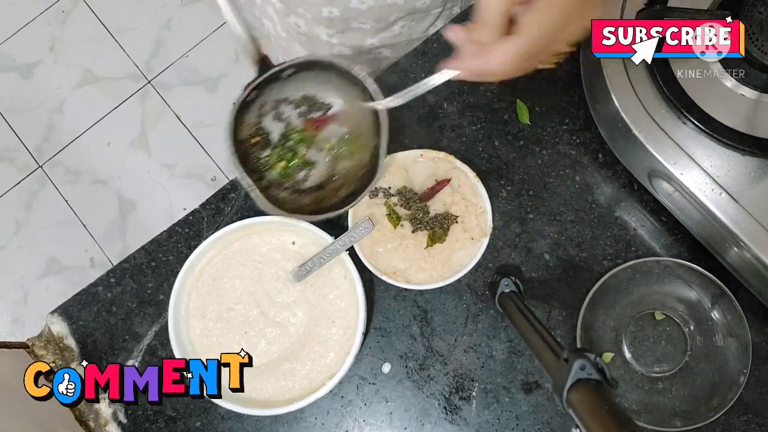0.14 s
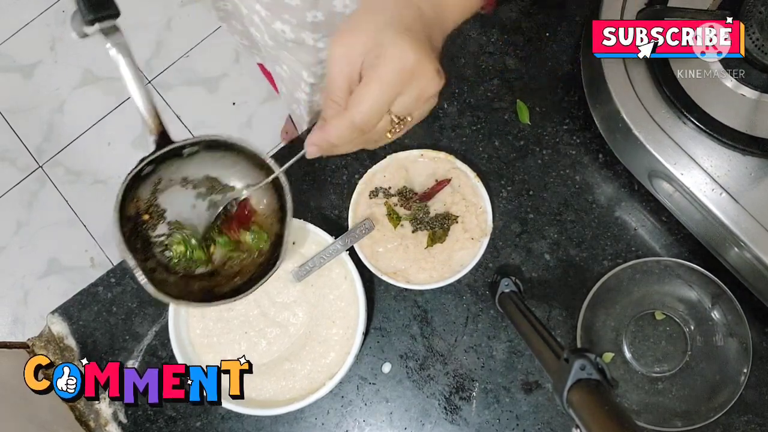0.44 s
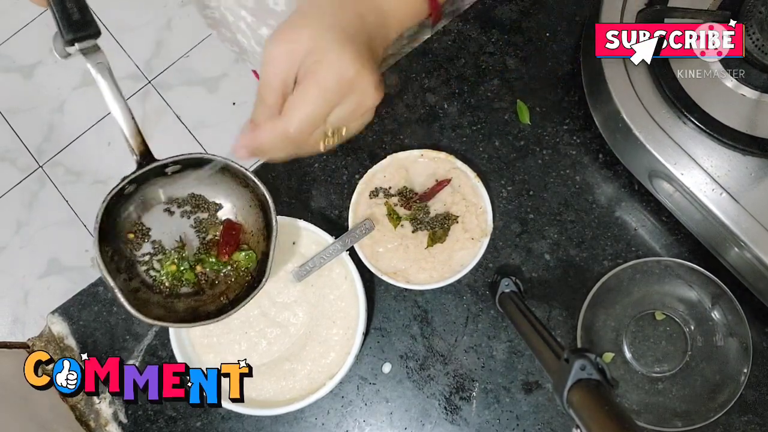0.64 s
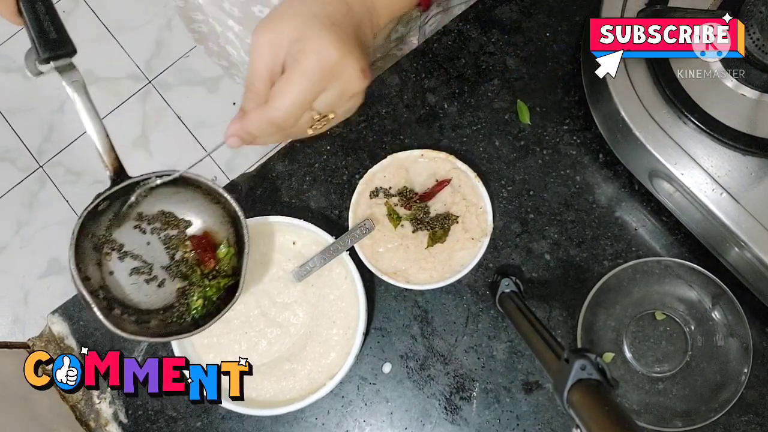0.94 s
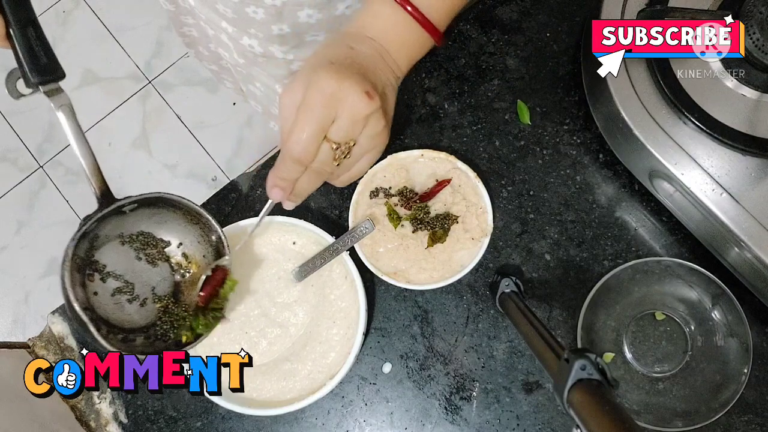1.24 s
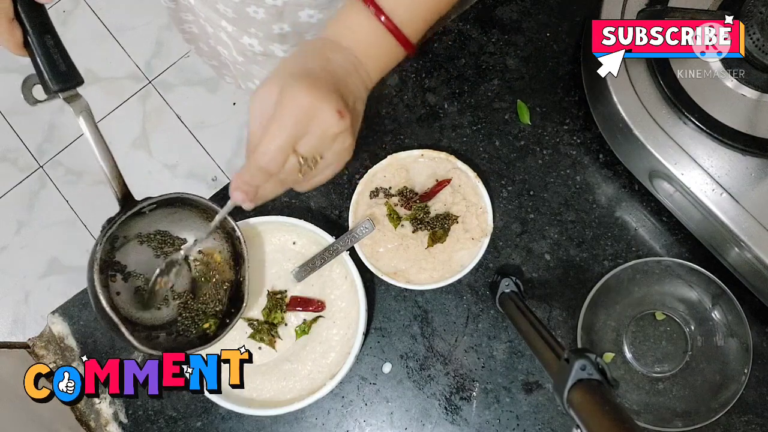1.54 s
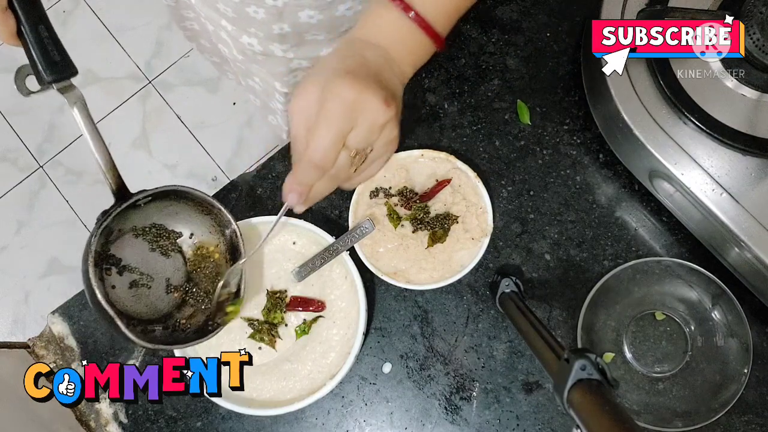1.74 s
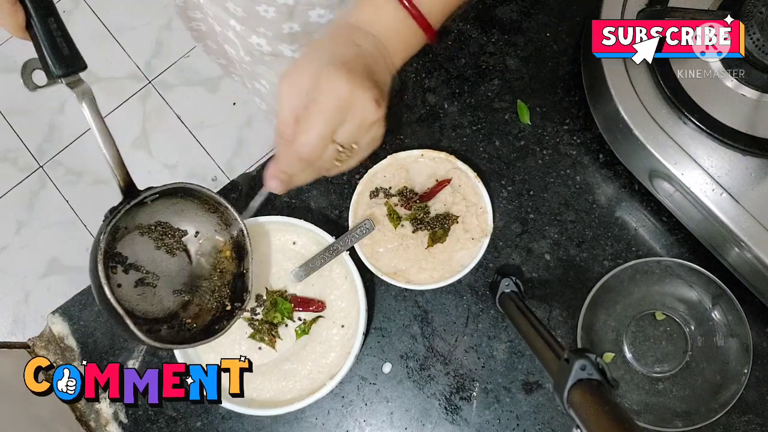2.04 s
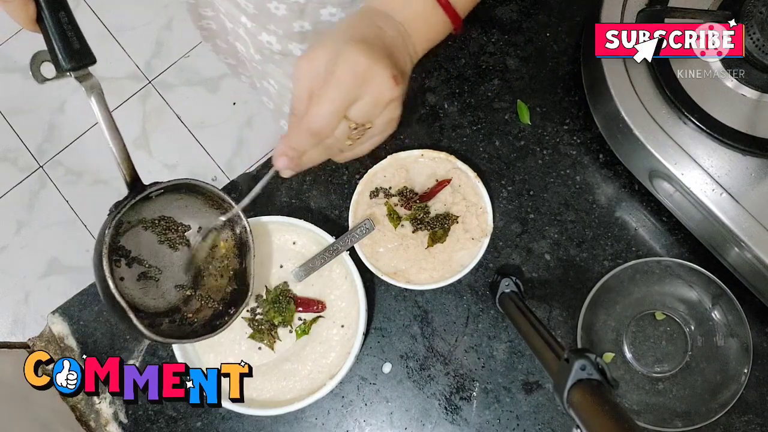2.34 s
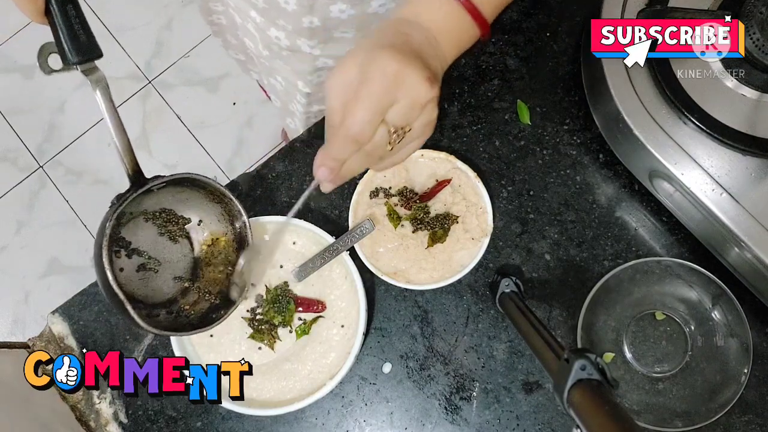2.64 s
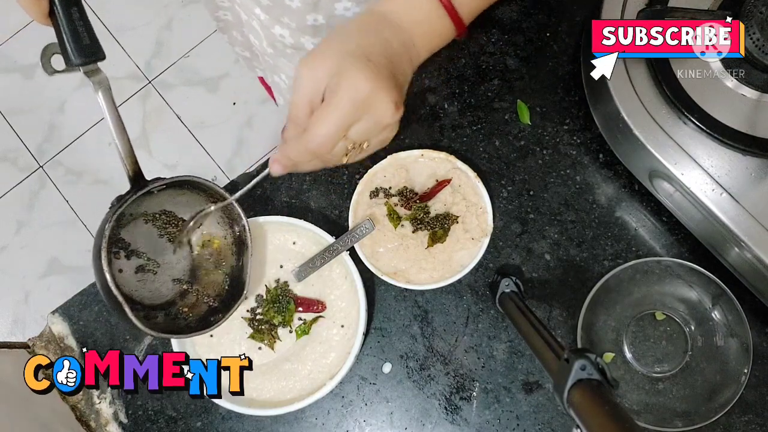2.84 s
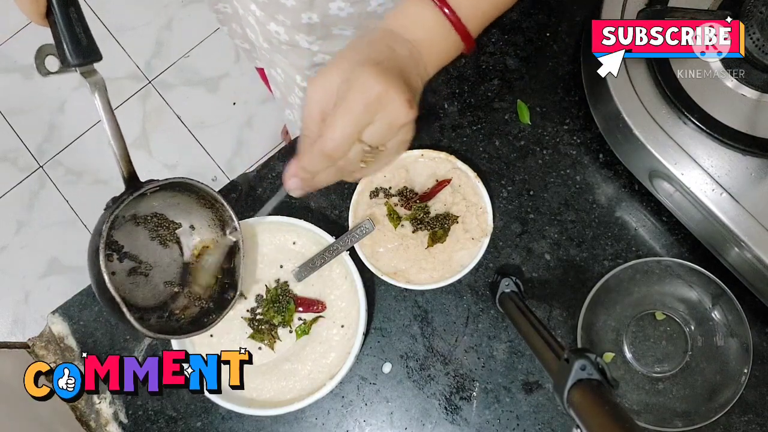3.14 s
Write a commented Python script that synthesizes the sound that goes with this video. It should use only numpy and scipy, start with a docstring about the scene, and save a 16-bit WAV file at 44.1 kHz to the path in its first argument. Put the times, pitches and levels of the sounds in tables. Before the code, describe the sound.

Oil sizzles in a small steel pan, a fine bright fizz flaring at 0.4-0.5 s as a spoon rattles in rapid clinks. Short gritty scrapes follow around 0.8 and 1.1 s, wet frying with a spit near 1.3-1.4, a soft scrape at 1.7. At 2.2 a sharp crack starts stronger, spitting sizzle that lasts to the end, with bright clinks at 3.0. Close stereo, small hard kitchen, faint wavering low hum.

```python
"""Sizzling spiced oil, scraped out

In a small kitchen, hot oil with spices sizzles in a small steel pan as a spoon scrapes it onto moist food.
Dense random clicks, one per bubble, are coloured into a bright fizz and a coarser wet frying.
Droplets spit as noise cracks with a short cavity ring; the spoon knocks, and slips many times per scrape,
each touch a clack plus damped steel modes. Two microphone ports hear the pan, left first; decaying noise
makes the room, and a wavering sine and coloured noise make the low hum and rumble."""
import sys
import numpy as np
from scipy import signal
from scipy.fft import rfft, irfft
from scipy.io import wavfile
from scipy.ndimage import uniform_filter1d

SR = 44100
rng = np.random.default_rng(int(sys.argv[2]) if len(sys.argv) > 2 else 0)


def wav_out(sig):
    """Save sig, one row per channel (or a flat mono array), as 16-bit PCM at SR to the path in sys.argv[1]."""
    wavfile.write(sys.argv[1], SR, np.round(np.clip(np.atleast_2d(sig).T, -1, 1) * 32767).astype(np.int16))


N = 145530  # length in samples
PORT_LAG_S = .00018  # how much later the right microphone port hears the pan

# fine fizz of the oil over time [t/s, level/dB]
FIZZ_LEVEL = [(0,-37),(.35,-38),(.43,-31.5),(.51,-30.5),(.6,-37.5),(.9,-39),(1.05,-42),(1.11,-35.5),(1.22,-41),(1.4,-37),(1.6,-42),(1.82,-42.5),(1.92,-38),(2.18,-38),(2.25,-33.5),(2.5,-35.5),(2.65,-33),(3.05,-33.5),(3.3,-34.5)]
# coarse wet frying over time [t/s, level/dB]
FRY_LEVEL = [(0,-64),(.36,-59),(.41,-44),(.52,-54.5),(.66,-49),(.85,-51.5),(1.05,-58),(1.2,-47),(1.3,-40),(1.42,-57),(1.58,-67),(1.75,-48.5),(1.92,-48),(2.18,-50.5),(2.25,-41),(2.42,-48),(2.7,-41.5),(3.1,-40.5),(3.3,-42.5)]
# relative spectrum of the fizz [f/Hz, level/dB]
FIZZ_SPECTRUM = [(300,-16.5),(1500,-25),(2600,-10.5),(4000,-11.5),(5500,-8),(6600,-8),(7500,-2),(8800,-1.5),(11000,-3),(15500,-3.5)]
# relative spectrum of the frying [f/Hz, level/dB]
FRY_SPECTRUM = [(200,-13.5),(550,-14.5),(850,-2),(1100,-2.5),(1550,5.5),(1950,-1),(2400,7),(3100,4),(4300,4.5),(6500,-1.5),(15000,-34)]
# bubbles per second, mean of their random excess in dB, rms flutter of the level in dB
FIZZ_PER_S, FIZZ_SPREAD_DB, FIZZ_FLUTTER_DB = 7000, 3.5, .7
FRY_PER_S, FRY_SPREAD_DB, FRY_FLUTTER_DB = 1100, 3.5, .8
CRACKLE_PER_S, CRACKLE_SPREAD_DB, CRACKLE_DB = 400, 2, -8.5  # CRACKLE_DB is against the fizz
SIZZLE_PAN_DB = 1  # left port over right


def sizzle():
    """Bright fizz and fine crackle of the oil and the lower frying where it meets moisture."""
    crackle = undb(CRACKLE_DB) * bubbles(CRACKLE_PER_S, CRACKLE_SPREAD_DB, FIZZ_FLUTTER_DB)
    fine = bubbles(FIZZ_PER_S, FIZZ_SPREAD_DB, FIZZ_FLUTTER_DB) + crackle
    fizz = colour(fine, FIZZ_SPECTRUM) * curve(FIZZ_LEVEL)
    coarse = bubbles(FRY_PER_S, FRY_SPREAD_DB, FRY_FLUTTER_DB)
    fry = colour(coarse, FRY_SPECTRUM) * curve(FRY_LEVEL)
    return fizz * port_gains(SIZZLE_PAN_DB) + fry


BUBBLE_RANGE = 6.46  # cap on a bubble's excess, in multiples of the spread
SIZZLE_APART = .6  # scatter of the port lag over the pan, as a share of it


def bubbles(rate, spread_db, flutter_db):
    """Dense bursting bubbles, mostly tiny, each a click at its own spot in the pan."""
    count = int(rate * N / SR)
    u = rng.random((count, 5))
    at = (u[:, 0] * (N - SR // 1000)).astype(int)
    excess = np.minimum(-np.log(u[:, 1]), BUBBLE_RANGE)
    polarity = np.sign(u[:, 2] - .5)
    size = undb(spread_db * excess) * polarity
    lag = np.clip(PORT_LAG_S * SR * (1 + SIZZLE_APART * (2 * u[:, 3] - 1)), 0, 20)  # samples
    side = u[:, 4] - .5
    left = np.bincount(at, size * (1 + side), N)
    right = np.bincount(at + np.round(lag).astype(int), size * (1 - side), N)
    return unit(np.array([left, right])) * undb(flutter_db * walk(45))


# droplets that spit in the pan [t/s, level/dB, cavity f/Hz, cavity level against the crack/dB]
DROPLETS = [(0.257,-38.5,4303,-8),(0.7179,-42,3165,5.5),(1.3148,-43,2430,6.5),(1.372,-34.5,2770,-2.5),(1.426,-27.5,4660,-26),(1.499,-45.5,7690,8.5),(1.569,-36.5,4530,-12),(1.774,-44,9854,-1),(1.912,-43,9000,-3),(1.967,-34,7300,-22.5),(2.024,-47.5,10770,-1.5),(2.2039,-20.5,9300,-5.5),(2.2079,-32,7640,0.5),(2.2254,-36,3964,-1.5),(2.257,-36.5,6000,-4),(2.3533,-34.5,7300,-2.5),(2.393,-46,7300,-7),(2.4169,-31.5,9320,-1.5),(2.453,-42.5,6110,-4),(2.6303,-31,9100,-6.5),(2.7126,-35,3923,-5),(2.7466,-43,3940,-19),(2.7914,-33.5,6030,-8.5),(2.8525,-43,5550,-8),(2.9222,-32.5,7950,-8),(2.9835,-35.5,5000,-5.5)]
# relative spectrum of the cracks [f/Hz, level/dB]
CRACK_SPECTRUM = [(200,-17),(800,-12),(1500,-13),(2400,1.5),(4200,1.5),(6400,-6.5),(7800,7.5),(11500,2.5),(15500,-0.5)]
POP_S, POP_SPRAY_S, POP_SPRAY_DB = .0011, .0137, -31  # decay times of crack and spray, spray against crack
CAVITY_T60_S, POP_PAN_DB = .0173, 2


def pops():
    """Water droplets flash to steam: a sharp crack, a brief cavity ring and a short spray."""
    t = np.arange(SR // 20) / SR
    cracks, cavities = np.zeros((2, N))
    for s, db, hz, cavity_db in DROPLETS:
        spray = undb(POP_SPRAY_DB) * np.exp(-t / POP_SPRAY_S)
        crack = snap(np.exp(-t / POP_S) + spray)
        add(cracks, s, undb(db) * crack)
        add(cavities, s, undb(db + cavity_db) * ring([(hz, 0, CAVITY_T60_S)], 1 / 20))
    return place(colour(cracks, CRACK_SPECTRUM) + cavities, POP_PAN_DB)


# relative spectrum of the spoon's clack [f/Hz, level/dB]
CLACK_SPECTRUM = [(150,-38.5),(410,-19),(520,-6),(620,0.5),(720,-10),(850,0),(1020,-7.5),(1280,-0.5),(1420,-3.5),(1560,2.5),(1850,3),(2300,-1.5),(3400,-9),(5500,-13),(6600,-18.5),(9000,-15.5),(15000,-3.5)]
# main modes of the steel while the spoon presses on it [f/Hz, level/dB, t60/s]
PRESSED_MAIN_MODES = [(4580,6,0.0098),(4482,-4,0.02),(4600,-9,0.0118)]
# upper modes of the steel while the spoon presses on it [f/Hz, level/dB, t60/s]
PRESSED_UPPER_MODES = [(7454,0.5,0.031),(7827,-15.5,0.0079),(7803,2.5,0.032)]
# high modes of the pan that ring on freely [f/Hz, level/dB, t60/s]
FREE_HIGH_MODES = [(4408,-1,0.33),(4345,3.5,0.59),(4420,-34.5,0.294),(4590,21,0.44),(4570,5,0.155),(4470,-12.5,0.3),(4930,-14,0.45)]
# low modes of the pan that ring on freely [f/Hz, level/dB, t60/s]
FREE_LOW_MODES = [(618.4,-18.5,0.373),(835.2,5,0.446),(1296,-10.5,0.39),(1296,-12.5,1),(1535,-2,0.84),(1587,-7.5,0.39),(1688,-8,0.56),(1814,-25,.25),(2182,5.5,0.179)]
KNOCK_S = .00282  # decay time of a clack
HIGH_RING_DB = -21  # free high ring against the main ring
HOLLOW_DB, HOLLOW_T60_S = -6.5, .01824  # hollow under the spoon, level against the clack
HOLLOW_LOW_HZ = 496  # highpass on the hollow and the upper ring
SPOON_PAN_DB, MAIN_PAN_DB = 1, -4  # left port over right


def spoon():
    """Contacts clack, ring the steel at a pitch set by the touch, and sound a hollow; the pan rings on."""
    t = np.arange(SR // 20) / SR
    clacks, main, body, rest = np.zeros((4, N))
    high, low = ring(FREE_HIGH_MODES, .5), ring(FREE_LOW_MODES, .5)
    for s, pitch, hollow_hz, clack_db, main_db, upper_db, low_db in contacts():
        add(clacks, s, undb(clack_db) * snap(np.exp(-t / KNOCK_S)))
        add(main, s, undb(main_db) * ring(PRESSED_MAIN_MODES, 1 / 10, pitch))
        add(main, s, undb(main_db + HIGH_RING_DB) * high)
        add(rest, s, undb(upper_db) * ring(PRESSED_UPPER_MODES, 1 / 10, pitch))
        hollow = ring([(hollow_hz, 0, HOLLOW_T60_S)], 1 / 10)
        add(rest, s, undb(clack_db + HOLLOW_DB) * hollow)
        add(body, s, undb(low_db) * low)
    highpass = signal.butter(4, HOLLOW_LOW_HZ, "high", fs=SR, output="sos")
    rest = signal.sosfilt(highpass, rest)
    touch = colour(clacks, CLACK_SPECTRUM) + waver(body) + rest
    return place(touch, SPOON_PAN_DB) + place(main, MAIN_PAN_DB)


# spoon knocks on the pan
# [t/s, hollow f/Hz, clack level/dB, main ring level/dB, upper ring level/dB, low ring level/dB]
SPOON_KNOCKS = [(0.377,1068,-44.5,-57.5,-57.5,-43),(0.4883,1279,-27,-36.5,-48,-41),(0.4934,1270,-30,-42,-44.5,-59),(0.4983,1532,-38,-34.5,-37.5,-52),(0.5057,1182,-37,-44,-44.5,-59),(0.5122,1260,-33.5,-33,-46.5,-58),(0.5185,1248,-37.5,-33,-49.5,-51),(0.5254,1625,-37.5,-31,-49,-59.5),(.537,894,-44.5,-40.5,-36,-66.5),(.7175,910,-40,-46,-53,-41),(.741,845.6,-45.5,-49.5,-53.5,-58),(1.094,905,-31,-35,-26,-56.5),(1.097,1540,-28.5,-34,-48,-49.5),(1.2453,666,-42.5,-32.5,-42,-49),(1.257,1275,-37,-47.5,-55.5,-51.5),(1.641,920,-50,-46,-63,-57),(1.6674,795,-41.5,-41,-37.5,-48.5),(2.205,1404,-34,-33.5,-46.5,-49.5),(2.25,940,-47,-42.5,-54,-45.5),(2.71,900,-52.5,-47.5,-56.5,-40),(3.0003,933.6,-27.5,-34,-25.5,-40.5),(3.0592,1620,-33.5,-27,-41,-59.5),(3.0624,740,-43.5,-29.5,-41.5,-51.5),(3.15,870,-54,-60,-36.5,-43.5)]
# spoon scrapes along the pan [t/s, length/s, slips per s, hollow f at start/Hz, hollow f at end/Hz,
# clack level/dB, main ring level/dB, upper ring level/dB, fall of the clack over the stroke/dB,
# bend of the ring as a share of its pitch]
SPOON_SCRAPES = [(0.765,0.0235,330,1612,1300,-42,-49.5,-57.5,-4,0.026),(.772,0.0254,227,843,664,-42,-61.5,-61.5,-3.5,0.0013),(.81,0.0423,270,1249,1563,-36,-50.5,-36.5,2.5,-0.0067),(.818,0.0467,190,730,956,-37,-41,-51.5,14,0.013),(1.107,0.032,355,1730,1428,-37,-43.5,-50.5,5.5,0.027),(1.111,0.0307,208,622,515,-38.5,-42,-56,14.5,-0.0017),(1.143,0.055,300,1685,1316,-34.5,-34.5,-39.5,4,0.0015),(1.145,0.038,260,579.9,680,-38,-63.5,-53.5,13,0.042),(1.257,0.016,270,1750,1440,-39.5,-39,-56,12.5,0.025),(1.723,0.0557,217,672.1,532.6,-44,-61,-62,0.5,0.0009),(1.721,0.0408,215,947.5,1750,-39,-61.5,-58.5,17,-0.0043)]
CONTACT_DETUNE = .0167  # rms scatter of the ring's pitch, as a share
SLIP_JITTER, SLIP_SCATTER_DB = .1, 1  # rms scatter of the slip gap (natural log) and of the slip level
SCRAPE_LOW_DB = -13.5  # low ring against the clack


def contacts():
    """Spoon touches, from knocks and stick-slip: s, pitch ratio, hollow Hz, clack, main, upper, low dB."""
    rows = [(s, 1 + CONTACT_DETUNE * rng.standard_normal(), *rest) for s, *rest in SPOON_KNOCKS]
    for (start, length, rate, start_hz, end_hz,
         clack_db, main_db, upper_db, fall_db, bend) in SPOON_SCRAPES:
        s = start
        share_db = 10 * np.log10(100 / rate)  # the power does not grow with the slip rate
        for gap, size, detune in rng.standard_normal((64, 3)):
            along = (s - start) / length
            if along > 1:
                break
            db = share_db + SLIP_SCATTER_DB * size
            clack = clack_db + db - fall_db * along
            pitch = 1 + bend * (along - .5) + CONTACT_DETUNE * detune
            hollow_hz = start_hz + (end_hz - start_hz) * along
            rows.append((s, pitch, hollow_hz, clack, main_db + db, upper_db + db, clack + SCRAPE_LOW_DB))
            s += np.exp(SLIP_JITTER * gap) / rate
    return rows


WAVER_S, WAVER_PER_S = .00025, 30  # rms time shift and its steps per second


def waver(x):
    """Let the pitch of a ring wander slightly by shifting it in time."""
    shift = WAVER_S * SR * walk(WAVER_PER_S)
    return np.interp(np.arange(N) - shift, np.arange(N), x)


# relative spectrum of the room's tail [f/Hz, level/dB]
TAIL_SPECTRUM = [(300,6),(1800,-1.5),(5000,-1),(15000,-12)]
EARLY_S, EARLY_DB = .00684, -4  # decay time and level of the reflections
ROOM_T60_S, LATE_DB = .429, -7.5


def kitchen(x):
    """Quick reflections from the counter and a short, duller tail from the tiled room."""
    t = np.arange(SR // 2) / SR
    early_envelope = np.exp(-t / EARLY_S) * (t > .001)
    late_envelope = np.exp(-np.log(1000) * t / ROOM_T60_S) * (t > .008)
    envelopes = np.array([early_envelope, late_envelope])
    h = rng.standard_normal((2, 2, len(t))) * envelopes[:, None]
    early, late = h / np.sqrt(np.sum(h ** 2, axis=-1, keepdims=True))
    reflections = undb(EARLY_DB) * convolve(x, early)
    tail = undb(LATE_DB) * colour(convolve(x, late), TAIL_SPECTRUM)
    return x + reflections + tail


# low hum over time [t/s, level/dB]
HUM_LEVEL = [(0,-43.5),(.45,-48.5),(.78,-42.5),(.95,-51.5),(1.5,-53),(2.3,-57.5),(2.7,-51.5),(3,-46),(3.25,-39.5),(3.3,-39.5)]
# relative spectrum of the room's rumble [f/Hz, level/dB]
RUMBLE_SPECTRUM = [(18,-54.5),(28,-41),(38,-23),(55,0),(70,-3),(100,1.5),(130,-6),(170,-15.5),(205,-13),(260,-21),(333,-15),(400,-22),(600,-23.5),(1200,-27.5),(3000,-37.5),(15000,-76.5)]
HUM_HZ, HUM_WANDER, HUM_STEPS_PER_S = 86.52, .01384, 8.73  # mean pitch, its rms wander as a share
RUMBLE_DB, RUMBLE_SIDE_DB, LOW_PAN_DB = -47.5, -9, -3  # side against mid; left port over right


def background():
    """A wavering low hum and the rumble of the room, from a sine and coloured noise."""
    hz = HUM_HZ * (1 + HUM_WANDER * walk(HUM_STEPS_PER_S))
    hum = np.sqrt(2) * np.sin(2 * np.pi * np.cumsum(hz) / SR) * curve(HUM_LEVEL)
    mid, side = colour(rng.standard_normal((2, N)), RUMBLE_SPECTRUM) * undb(RUMBLE_DB)
    return (hum + mid) * port_gains(LOW_PAN_DB) + undb(RUMBLE_SIDE_DB) * np.array([side, -side])


def port_gains(pan_db):
    """Gains of the left and right ports, pan_db apart."""
    return undb(np.array([[pan_db], [-pan_db]]) / 2)


def place(x, pan_db):
    """Two microphone ports: the left one hears the pan slightly earlier."""
    x = np.ravel(x)
    late = np.pad(x, (int(round(PORT_LAG_S * SR)), 0))[:N]
    return np.array([x, late]) * port_gains(pan_db)


def ring(modes, seconds, pitch=1):
    """Response of damped modes to one tap."""
    t = np.arange(int(seconds * SR)) / SR
    total = np.zeros(len(t))
    for hz, db, t60 in modes:
        decay = np.exp(-np.log(1000) * t / t60)
        total += undb(db) * decay * np.sin(2 * np.pi * hz * pitch * t)
    return burst(total)


def snap(envelope):
    """A brief noise burst with an even spectrum."""
    spectrum = rfft(rng.standard_normal(len(envelope)) * envelope, 2 * len(envelope))
    return burst(irfft(spectrum / np.abs(spectrum))[:len(envelope)])


def colour(x, points):
    """Causal (minimum-phase) filter through (Hz, dB) points that keeps the power of white noise."""
    size = 8192
    hz, db = np.array(points).T
    bins = np.fft.rfftfreq(size, 1 / SR)
    gain = unit(undb(np.interp(np.log(bins + 1), np.log(hz), db)))
    # folding the cepstrum onto positive times gives minimum phase
    cepstrum = irfft(np.log(gain))
    cepstrum[1:size // 2] *= 2
    cepstrum[size // 2 + 1:] = 0
    return convolve(x, irfft(np.exp(rfft(cepstrum))))


def convolve(x, h):
    """Play x through the response h."""
    return signal.fftconvolve(np.atleast_2d(x), np.atleast_2d(h), axes=-1)[:, :N]


def walk(rate):
    """Smooth random wandering with rms 1, in rate steps per second."""
    k = int(SR / rate)
    steps = np.repeat(rng.standard_normal(N // k + 1), k)
    return unit(uniform_filter1d(steps, k)[:N])


def curve(rows):
    """Gain over time from (s, dB) points."""
    return undb(np.interp(np.arange(N) / SR, *np.array(rows).T))


def undb(db):
    """Decibels to gain."""
    return 10 ** (np.asarray(db) / 20)


def unit(x):
    """Scale to rms 1."""
    return x / np.sqrt(np.mean(x ** 2))


def burst(x):
    """Scale a short sound to the energy of 10 ms at rms 1."""
    return x * np.sqrt(SR / 100 / np.sum(x ** 2))


def add(out, s, x):
    """Mix x into out from time s."""
    i = int(s * SR)
    out[i:i + len(x)] += x[:N - i]


def scene():
    """Pan and spoon in the kitchen, over the hum and rumble."""
    return kitchen(sizzle() + pops() + spoon()) + background()


TOP_HZ = 15400  # upper limit of the recorder


def record(dry):
    """The recorder cuts the top with a steep lowpass."""
    return signal.sosfilt(signal.ellip(10, .2, 80, TOP_HZ, fs=SR, output="sos"), dry)


dry = scene()
out = record(dry)
wav_out(out)
```